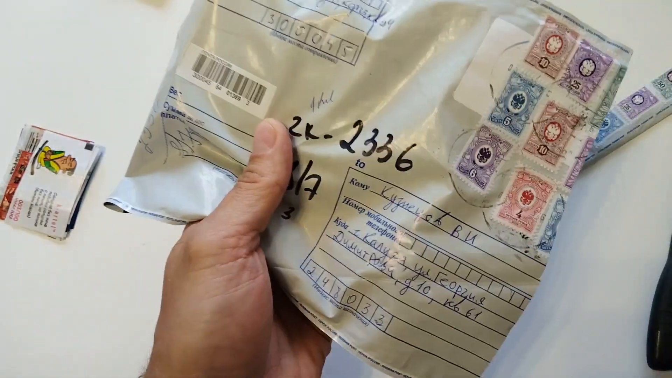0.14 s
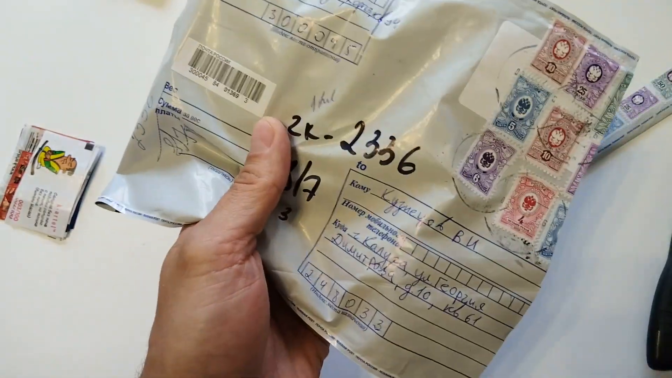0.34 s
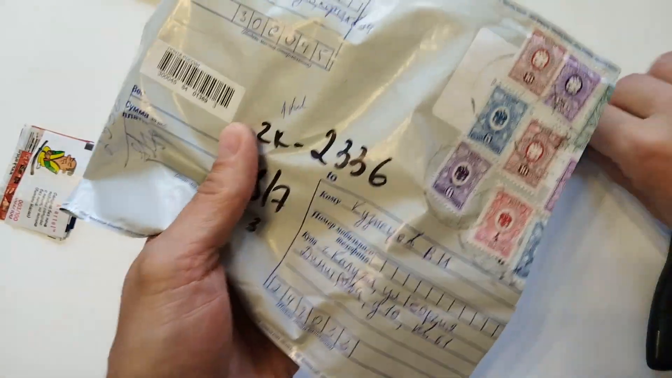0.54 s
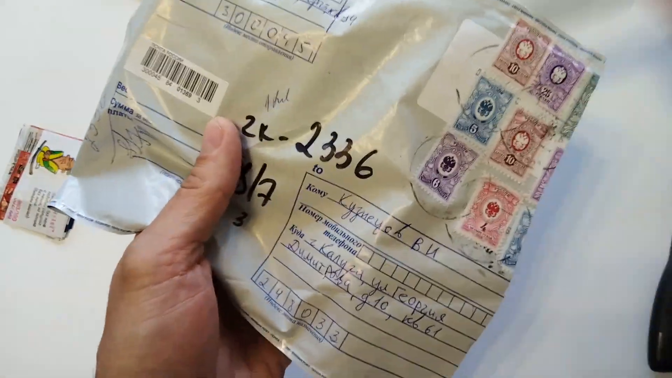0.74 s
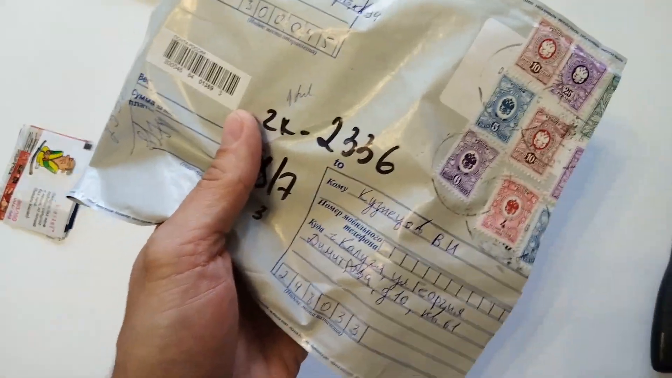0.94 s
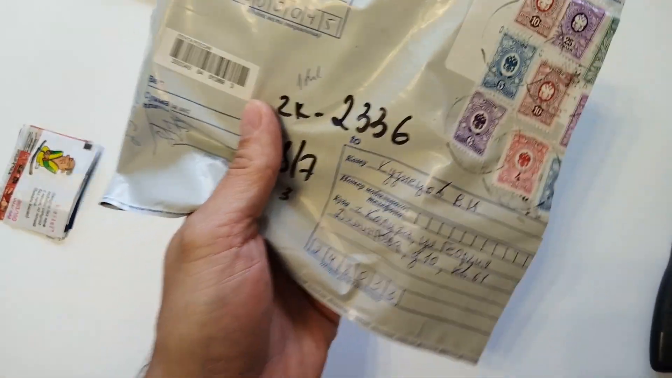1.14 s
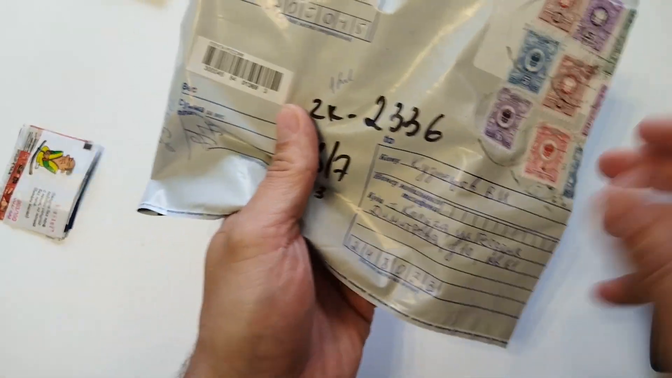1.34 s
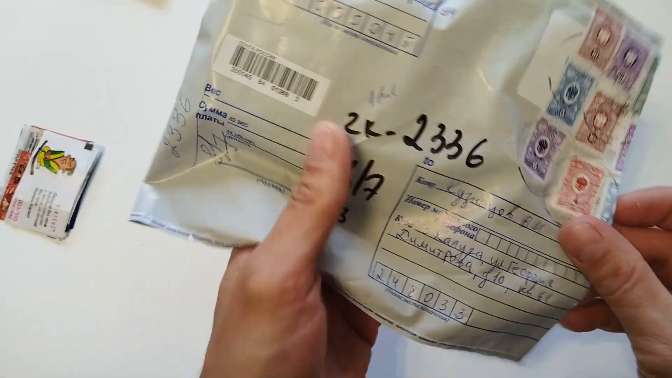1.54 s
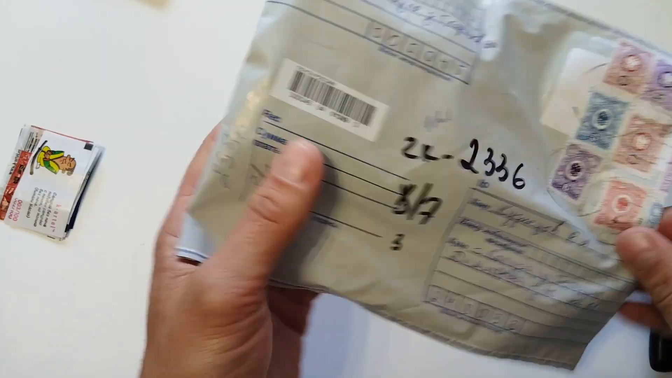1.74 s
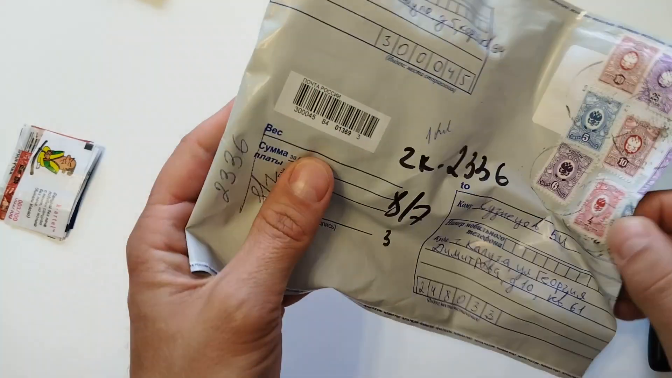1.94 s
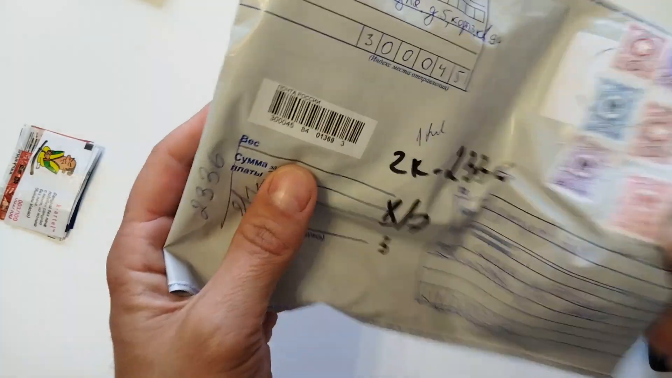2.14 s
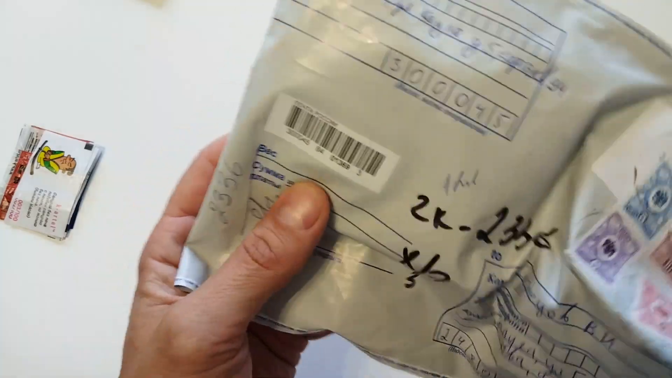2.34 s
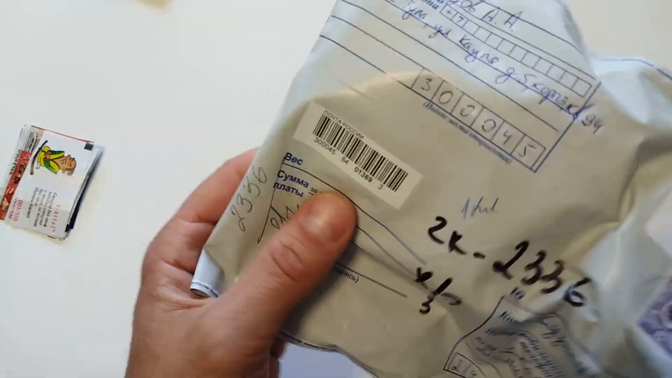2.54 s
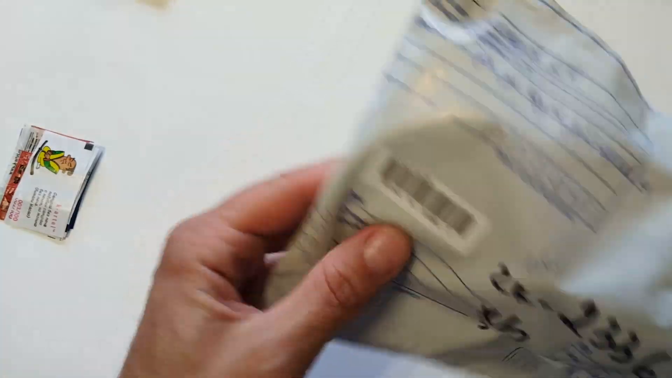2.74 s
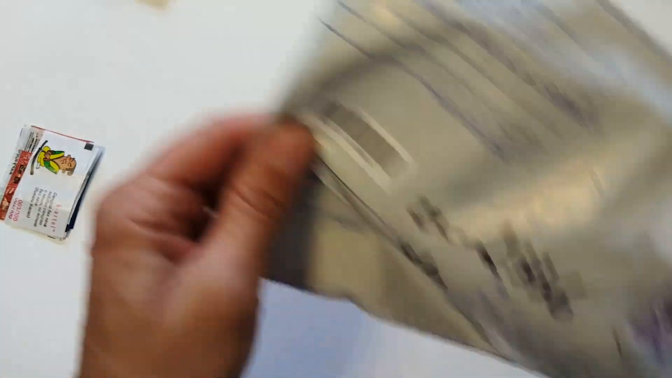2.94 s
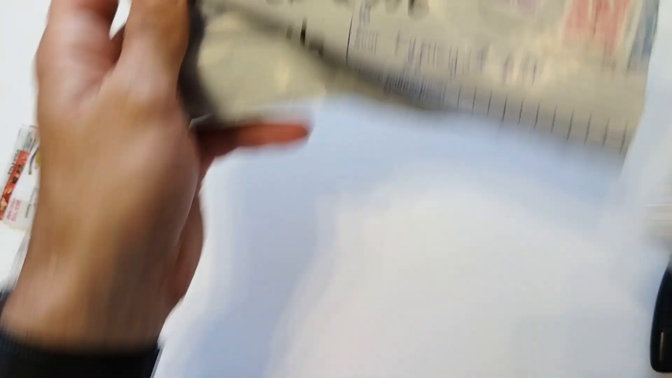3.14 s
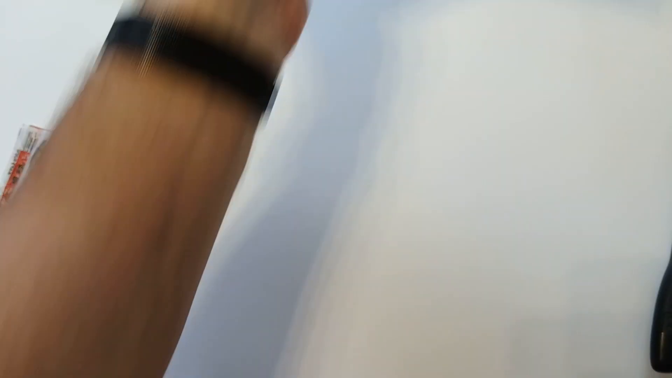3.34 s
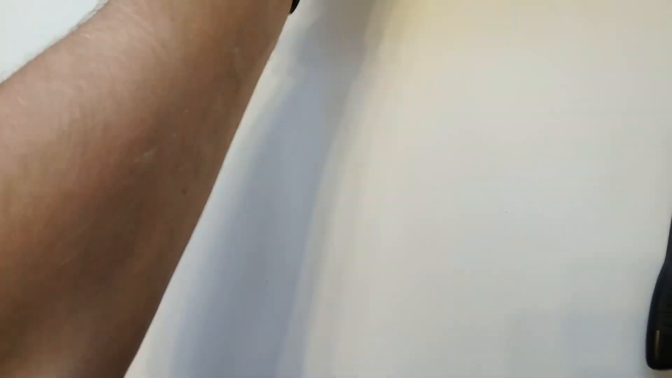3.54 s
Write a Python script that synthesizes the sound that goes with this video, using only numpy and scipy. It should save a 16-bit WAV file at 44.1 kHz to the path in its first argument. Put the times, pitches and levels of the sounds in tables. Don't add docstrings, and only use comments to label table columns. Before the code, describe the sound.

Plastic mailer crinkling and snapping in two hands, with a few knocks on a table early on

```python
import sys
import numpy as np
from scipy import signal
from scipy.fft import rfft, irfft
from scipy.io import wavfile
from scipy.ndimage import uniform_filter1d

SR = 44100
rng = np.random.default_rng(int(sys.argv[2]) if len(sys.argv) > 2 else 0)


def amplitude_ratio(level_db):
    exponent = np.asarray(level_db, float) / 20
    return 10 ** exponent


def log_audio(samples):
    frames = np.atleast_2d(samples).T
    limited = np.clip(frames, -1, 1)
    pcm = np.round(limited * 32767).astype(np.int16)
    wavfile.write(sys.argv[1], SR, pcm)


N = 160965


def in_time(rows):
    s, *columns = np.transpose(rows)
    return [np.interp(np.arange(N) / SR, s, column) for column in columns]


def unit(x):
    return x / np.sqrt(np.mean(x ** 2) + 1e-20)


def drift(rate):
    knots = rng.standard_normal(400)
    return np.interp(np.arange(N) / SR * rate, np.arange(400), knots)


def colour(x, points):
    hz, db = np.transpose(points)
    f = np.maximum(np.fft.rfftfreq(N, 1 / SR), 1)
    gain_db = np.interp(np.log(f), np.log(hz), db)
    return irfft(rfft(x) * amplitude_ratio(gain_db), N)


def band_filter(x, order, hz, kind):
    return signal.sosfilt(signal.butter(order, hz, kind, fs=SR, output="sos"), x)


def ring(clicks, hz, t60):
    radius, angle = amplitude_ratio(-60 / (t60 * SR)), 2 * np.pi * hz / SR
    return signal.lfilter([0, np.sin(angle)], [1, -2 * radius * np.cos(angle), radius ** 2], clicks + 1e-18)


def add(out, s, sound, pan_db):
    i = int(s * SR)
    sound = sound[:, :N - i] * amplitude_ratio(np.array([[pan_db / 2], [-pan_db / 2]]))
    out[:, i:i + sound.shape[1]] += sound


# multiple of the shaft's turning rate, level in dB rms.
MOTOR_TONES = [(4, -65), (4.5, -65), (5, -60), (6, -69), (9, -68), (10, -62)]
# frequency in Hz, level in dB per Hz.
AIR_COLOUR = [(15, -74), (25, -25), (123, -13.5), (229, -11.5), (270, -18), (476, -18.5), (531, -29),
              (14800, -53), (16000, -67)]


def background():
    shaft_hz, wobble_db, blur_rad, air_db = 48.64, 2, 0.6, -54.5
    t = np.arange(N) / SR
    hum = np.zeros(N)
    for multiple, db in MOTOR_TONES:
        level = np.sqrt(2) * amplitude_ratio(db + wobble_db * drift(6.1))
        turns = multiple * shaft_hz * t + rng.random()
        hum += level * np.sin(2 * np.pi * turns + blur_rad * drift(25))
    noise = rng.standard_normal((3, N))
    own_side = band_filter(noise[1:], 1, 500, "high")
    air = unit(colour(noise[0] + own_side, AIR_COLOUR))
    return hum + amplitude_ratio(air_db + 1.2 * drift(5.6)) * air


def grains(per_s, spread_db, low_hz, high_hz, cycles, spectrum, width):
    sizes = amplitude_ratio(spread_db * np.minimum(rng.exponential(1, N), 4)) * rng.choice([-1, 1], N)
    clumping = amplitude_ratio(4.0 * drift(50) + 3.5 * drift(17))
    born = rng.random(N) < per_s * clumping / SR
    angle = np.pi / 4 + width * rng.uniform(-1.41, 1, N)
    clicks = sizes * born * np.array([np.cos(angle), np.sin(angle)])
    region = rng.integers(0, 12, N)
    out = np.zeros((2, N))
    for k, hz in enumerate(np.geomspace(low_hz, high_hz, num=12)):
        struck = clicks * (region == k) * amplitude_ratio(4.5 * drift(13))
        out += ring(struck, hz, cycles / hz) * np.sqrt(hz)
    bins = rfft(out)
    power = uniform_filter1d(np.mean(np.abs(bins) ** 2, 0), size=1500)
    return unit(colour(irfft(bins / np.sqrt(power + 1e-9), N), spectrum))


# time in seconds, fine rustle in dB, bending of large panels in dB.
HAND_EFFORT = [(0, -48.5, -51), (.2, -71.5, -56.5), (1.02, -57, -57), (1.1, -75, -64), (1.3, -84, -87),
               (1.45, -49, -52), (1.7, -99, -67.5), (1.8, -52.5, -49.5), (1.9, -50, -39.5),
               (2.15, -58, -46), (2.42, -46, -42.5), (2.55, -49.5, -33), (2.76, -44.5, -40.5),
               (3.22, -40.5, -35.5), (3.4, -45, -40.5), (3.52, -61.5, -59.5), (3.65, -60, -64)]
# start in seconds, level in dB, top-octave sheen in dB, hold in seconds, t60 in seconds.
FILM_SLIDES = [(0.223, -38.5, -44, 0.033, 0.31), (0.281, -46, -61, 0.0085, 0.36),
               (0.417, -36.5, -59, 0.086, .4), (0.75, -48.5, -42, 0.009, 0.61),
               (0.832, -41.5, -37, 0.007, 0.33), (1.201, -81, -59.5, 0.09, .3),
               (1.319, -44, -39.5, 0.15, 0.43), (1.711, -61, -55, 0.032, 0.92),
               (1.858, -38.5, -37.5, 0.0085, 1), (2.204, -33.5, -29.5, 0.011, 0.39),
               (3.29, -44, -27, .01, 0.29)]
# middle in seconds, fine folds in dB, panels in dB, half length in seconds.
FIST_CRUNCHES = [(1.415, -37, -52, 0.0065), (1.91, -37, -60, 0.013), (2.055, -46, -42, 0.01),
                 (2.55, -37, -32, 0.026), (2.774, -29.5, -25.5, 0.02), (2.862, -33.5, -42, 0.0043),
                 (2.907, -31.5, -26.5, 0.016), (2.963, -41.5, -30.5, 0.017), (3.022, -39.5, -49, 0.017),
                 (3.085, -54, -32.5, 0.0095), (3.148, -64.5, -27.5, 0.0041), (3.23, -29.5, -40.5, 0.022)]
# frequency in Hz, level in dB per Hz.
FOLD_COLOUR = [(700, -20.5), (1620, -8), (2510, -6.5), (3770, -4), (7900, -5.5), (8900, -15), (15200, -13),
               (16000, -21)]
# frequency in Hz, level in dB per Hz.
PANEL_COLOUR = [(35, -31), (60, 2.5), (107, 1), (263, -1.5), (808, 1), (1070, -1.5), (1720, -1.5),
                (4000, -10.5), (5200, -28), (8800, -120)]


def rustle():
    fold_db, panel_db, sheen_hz = 7, -1.5, 8500
    effort_db, bending_db = in_time(HAND_EFFORT)
    t = np.arange(N) / SR
    slide_power, sheen_power, fine_crunch, panel_crunch = np.zeros((4, N))
    for s, db, sheen_db, hold, t60 in FILM_SLIDES:
        slid = (t > s) * amplitude_ratio(-120 * np.maximum(t - s - hold, 0) / t60)
        slide_power += amplitude_ratio(2 * db) * slid
        sheen_power += amplitude_ratio(2 * sheen_db) * slid
    for s, fine_db, bend_db, half in FIST_CRUNCHES:
        swell = np.exp(-((t - s) / half) ** 2)
        fine_crunch += amplitude_ratio(2 * fine_db) * swell
        panel_crunch += amplitude_ratio(2 * bend_db) * swell
    folds = grains(11000, 4.0, 1700, 14000, 11.0, FOLD_COLOUR, width=1.3)
    sheen = unit(band_filter(folds[:, ::-1], 2, sheen_hz, "high"))
    fine_level = np.sqrt(amplitude_ratio(2 * (effort_db + fold_db)) + slide_power + fine_crunch)
    panel_level = np.sqrt(amplitude_ratio(2 * (bending_db + panel_db)) + panel_crunch)
    panels = grains(1500, 1.5, 124.3, 3560, 8.2, PANEL_COLOUR, width=0.64)
    return fine_level * folds + np.sqrt(sheen_power) * sheen + panel_level * panels


# time in seconds, peak in dB, pitch in Hz.
HELD_SNAPS = [(0.212, -13.4, 7900), (0.2921, -15.6, 4530), (0.3947, -16.9, 6600), (0.4355, -21.1, 3430),
              (0.4419, -15.9, 7690), (0.5113, -20.5, 8320), (0.6569, -23.0, 11970), (0.7459, -29.1, 5650),
              (0.8274, -28.3, 5210), (1.02, -30.5, 6770), (1.4167, -21.3, 7560), (1.4563, -8.3, 7390)]
# time in seconds, peak in dB, pitch in Hz.
KNEADED_SNAPS = [(1.8495, -20.5, 8010), (1.8646, -13, 4500), (2.0013, -20.0, 4450), (2.0176, -22.3, 3830),
                 (2.1039, -17, 3650), (2.172, -23.2, 2930), (2.1912, -21.4, 3590), (2.2108, -11.5, 11420),
                 (2.2203, -17.3, 6640), (2.342, -21.4, 4240), (2.4301, -23.5, 3240), (2.4414, -16, 4000),
                 (2.459, -25.2, 3410), (2.5994, -16.7, 2790), (2.6181, -13, 7070), (2.6417, -1.7, 4760),
                 (2.7748, -11.2, 4540), (2.8667, -17.0, 9000), (2.9044, -12.8, 5450), (2.9713, -20.9, 2640),
                 (3.1017, -21.9, 2830), (3.1438, -8.0, 3750), (3.148, -12.6, 3170), (3.2902, -8.8, 5880),
                 (3.4043, -23.9, 3610), (3.4601, -27.7, 3320), (3.5908, -29, 8500), (3.6124, -33.1, 6220),
                 (3.6364, -26.9, 7620)]
# time in seconds, peak in dB, pitch in Hz.
MORE_SNAPS = [(0.1659, -43, 2530), (0.9647, -34, 7590), (1.7744, -51, 3080), (1.9116, -18.5, 4430),
              (2.1784, -26.5, 3480), (2.2474, -21, 4300), (2.4937, -25.5, 3860), (2.5162, -28, 2530),
              (2.5671, -24, 2550), (2.7482, -43, 2770), (2.7551, -18, 6100), (2.834, -27, 2540),
              (3.0774, -21.5, 2460), (3.2156, -29, 6300), (3.5533, -38, 7140)]


def snaps():
    rise_s, t60_s, crackle_db, broad_db = 0.0015, 0.012, -28, -5
    width = 0.4
    held_pan_db, kneaded_pan_db, pan_spread_db = 6, 2.7, 1.5
    out, lead = np.zeros((2, N)), 300
    t = (np.arange(1500) - lead) / SR
    shape = np.where(t < 0, np.exp(t / rise_s), amplitude_ratio(-60 * t / t60_s))
    for s, db, hz in list(HELD_SNAPS) + list(KNEADED_SNAPS) + list(MORE_SNAPS):
        pan_db = kneaded_pan_db if 1.3 < s < 3.5 else held_pan_db
        pan_db += pan_spread_db * rng.standard_normal()
        noise = rng.standard_normal((3, len(t))) ** 3
        burst = amplitude_ratio(crackle_db) * (noise[0] + noise[1:]) * shape
        burst[[0, 1], lead + rng.integers(-3, 4, 2)] += 1
        pitched = band_filter(burst, 2, [hz * (1 - width), min(hz * (1 + width), 19000)], "band")
        broad = band_filter(burst, 2, [1300, 10000], "band")
        sound = unit(pitched) + amplitude_ratio(broad_db) * unit(broad)
        add(out, s - lead / SR, amplitude_ratio(db + 1.5) * sound / np.abs(sound.mean(0)).max(), pan_db)
    return out


# frequency in Hz, level in dB, t60 in seconds.
EDGE_TONES = [(277.3, -6, 0.51), (728, -2.5, 0.045), (819, -6, 0.11), (891, -2, 0.058), (1631, -15.5, .04),
              (2570, -11, .05), (4366, -15, .05)]


def edge():
    start_s, knock_db, scuff_db, scuff_t60_s = 0.293, -19.5, -29.5, 0.53
    out, click, knock = np.zeros((2, N)), np.zeros(SR // 2), np.zeros(SR // 2)
    t = np.arange(SR // 2) / SR
    click[[0, 700]] = 1, 0.5
    for k, (hz, db, t60) in enumerate(EDGE_TONES):
        knock += (-1) ** k * amplitude_ratio(knock_db + db) * ring(click, hz, t60)
    noise = band_filter(rng.standard_normal((2, len(t))), 1, [900, 5000], "band")
    scuff = unit(noise) * amplitude_ratio(scuff_db - 60 * t / scuff_t60_s)
    add(out, start_s, knock + scuff, 1.0)
    return out


# time in seconds, table level in dB, carton level in dB.
TABLE_BLOWS = [
    (0.295, -22.5, -45),
    (0.4353, -28, -11),
    (0.439, -20, -17),
    (0.514, -31.5, -17.5),
    (0.748, -24, -47.5),
    (1.091, -41.5, -69),
]
# frequency in Hz, level in dB, t60 in seconds.
TABLE_TONES = [(86, -19, 0.9), (105.2, 0.5, 0.46), (127.1, -2, 0.72), (187.8, -3.5, 0.16),
               (216.5, -16, 0.72), (278.4, -7, 0.25)]
# frequency in Hz, level in dB, t60 in seconds.
CARTON_TONES = [(417, -7.5, 0.16), (622, -11.5, 0.27), (817, 10, 0.021), (880, 3.5, 0.11),
                (1050, -5, 0.029), (1178, 2.5, 0.047), (1288, -7.5, 0.11), (1280, -7.5, 0.16),
                (1563, -8.5, 0.15), (1773, -6, 0.11), (1960, -6.5, 0.075), (2360, -13.5, 0.041)]


def table():
    contact_hz = 225
    rattle_from_s, rattle_to_s, rattle_per_s = 0.437, 0.545, 600
    rattle_db, rattle_damping = -25, 0.12
    n = int(1.8 * SR)
    s, table_db, carton_db = np.transpose(TABLE_BLOWS)
    i, out, t = (s * SR).astype(int), np.zeros((2, N)), np.arange(n) / SR
    loose = (rng.random(n) < rattle_per_s / SR) * (t > rattle_from_s) * (t < rattle_to_s)
    for k, (hz, db, t60) in enumerate(TABLE_TONES):
        clicks = np.zeros(n)
        clicks[i] = amplitude_ratio(table_db + db)
        out[:, :n] += (-1) ** k * ring(band_filter(clicks, 2, contact_hz, "low"), hz, t60)
    for hz, db, t60 in CARTON_TONES:
        clicks = np.zeros(n)
        clicks[i] = amplitude_ratio(carton_db + db - 7.0 + rng.normal(0, 1.2, len(s))) * rng.choice([-1, 1])
        out[:, :n] += ring(clicks, hz, t60) * amplitude_ratio(rng.normal(0, 3.0, (2, 1)))
        rattle = loose * rng.standard_normal((2, n)) * amplitude_ratio(rattle_db + db / 2)
        out[:, :n] += ring(rattle, hz, t60 * rattle_damping)
    return out


# time in seconds, peak in dB, pitch in Hz.
PANEL_POPS = [(1.004, -33.6, 500), (1.4562, -27.0, 2270), (1.8521, -28.9, 1200), (1.8645, -22.1, 870),
              (1.9144, -22.9, 1000), (2.1026, -18.5, 1660), (2.1728, -26.6, 850), (2.211, -22.9, 1020),
              (2.2202, -24.3, 940), (2.3419, -26.6, 1040), (2.4415, -23.0, 1730), (2.5993, -8.5, 1640),
              (2.6187, -13.3, 1600), (2.6418, -18.1, 1790), (2.6911, -25.5, 470), (2.7674, -21, 1800),
              (2.7748, -15.5, 1750), (2.8353, -19.2, 1650), (2.9049, -17.3, 1440), (2.9599, -18, 760),
              (2.9714, -19.0, 700), (3.0788, -23.8, 1870), (3.1028, -24.3, 2330), (3.1433, -15.9, 2310),
              (3.2232, -23.5, 1310), (3.2853, -22.6, 1530)]
# time in seconds, peak in dB, pitch in Hz.
MORE_POPS = [(1.518, -50, 510), (1.544, -39, 824), (1.755, -50, 482), (1.772, -38, 760), (1.93, -26, 2290),
             (1.974, -28.5, 1060), (2.001, -28, 1080), (2.056, -32, 850), (2.187, -31, 880),
             (2.414, -29.5, 1170), (2.514, -44, 1740), (2.528, -27, 1040), (2.568, -42, 794),
             (2.664, -30, 525), (2.726, -31, 476), (2.757, -30, 810), (2.864, -20.5, 2270),
             (2.941, -27, 396), (3.184, -20.5, 1570), (3.329, -22, 1620)]


def pops():
    cycles, scuff_db, scuff_t60_s, pan_spread_db = 7.0, -12, 0.04, 1.5
    out, t = np.zeros((2, N)), np.arange(2000) / SR
    for s, db, hz in list(PANEL_POPS) + list(MORE_POPS):
        pan_db = pan_spread_db * rng.standard_normal()
        phase = rng.uniform(0.13, 0.17, (2, 1))
        envelope = (1 - np.exp(-t * hz)) * amplitude_ratio(-60 * t * hz / cycles)
        tone = np.sin(2 * np.pi * hz * t + phase) * envelope
        noise = band_filter(rng.standard_normal((2, len(t))), 2, [400, 2600], "band")
        scuff = unit(noise) * amplitude_ratio(scuff_db - 60 * t / scuff_t60_s)
        add(out, s - 1 / hz, amplitude_ratio(db) * (tone / np.abs(tone).max() + scuff), pan_db)
    return out


# start in seconds, end in seconds, hollow's pitch in Hz, level in dB.
BAG_DRAGS = [
    (3.257, 3.594, 1640, -49),
    (3.33, 3.517, 459, -45.5),
]


def drag():
    t, out = np.arange(N) / SR, np.zeros((2, N))
    for start, end, hz, db in BAG_DRAGS:
        arch = np.sqrt(np.clip((t - start) * (end - t), 0, 1)) * 2 / (end - start)
        hollow = unit(ring(rng.standard_normal((2, N)), hz, 29.0 / hz))
        out += amplitude_ratio(db + 2.8 * drift(37)) * arch * hollow
    return out


def room(x):
    t60_s, treble_t60_s, gap_s, level_db = 0.48, 0.36, 0.004, -5
    t = np.arange(int(0.7 * SR)) / SR
    noise = rng.standard_normal((2, len(t)))
    low = band_filter(noise, 2, 2500, "low")
    tail = low * amplitude_ratio(-60 * t / t60_s) + (noise - low) * amplitude_ratio(-60 * t / treble_t60_s)
    tail *= t > gap_s
    tail[1] += 0.68 * tail[0] - 0.95 * band_filter(tail[0], 1, 900, "high")
    tail = band_filter(tail, 2, 250, "high")
    tail /= np.sqrt(np.sum(tail ** 2, 1, keepdims=True))
    return amplitude_ratio(level_db) * signal.fftconvolve(x, tail, axes=1)[:, :N]


def scene():
    film_echo_db = -9
    film = rustle() + snaps() + pops() + drag()
    wood = edge() + table()
    return background() + film + wood + room(amplitude_ratio(film_echo_db) * film + wood)


def top_cut(x):
    return signal.sosfilt(signal.butter(12, 16490, fs=SR, output="sos"), x)


def record(dry):
    port_lag_s, low_hz, top_hz = 0.0001, 76, 15150
    late = np.roll(dry[1], int(port_lag_s * SR))
    x = band_filter(np.array([dry[0], late]), 2, low_hz, "high")
    x = signal.sosfilt(signal.cheby1(16, 1, top_hz, fs=SR, output="sos"), x)
    return top_cut(np.tanh(x))


dry = scene()
out = record(dry)
log_audio(out)
```